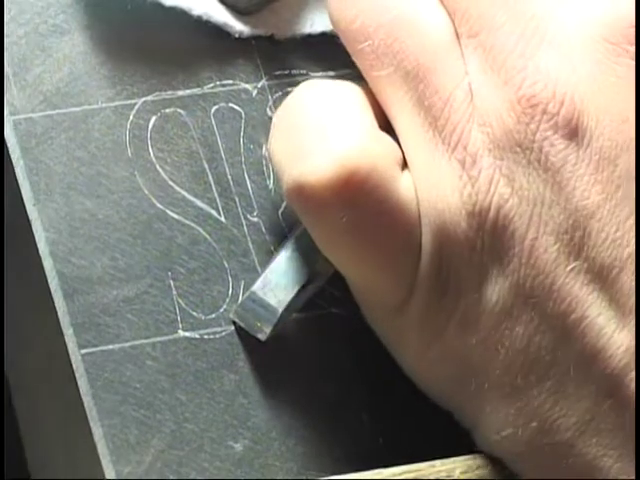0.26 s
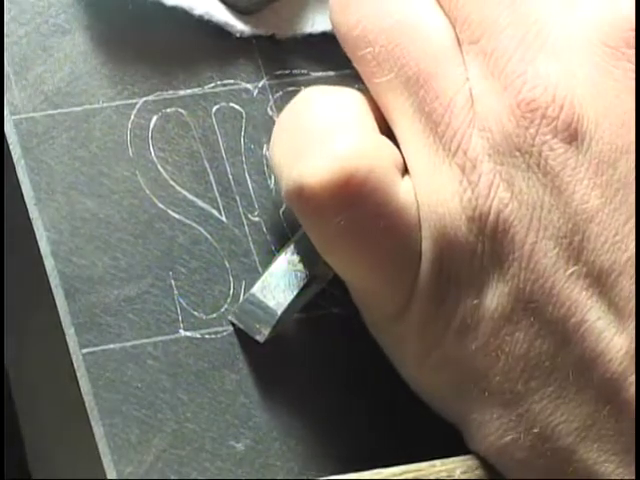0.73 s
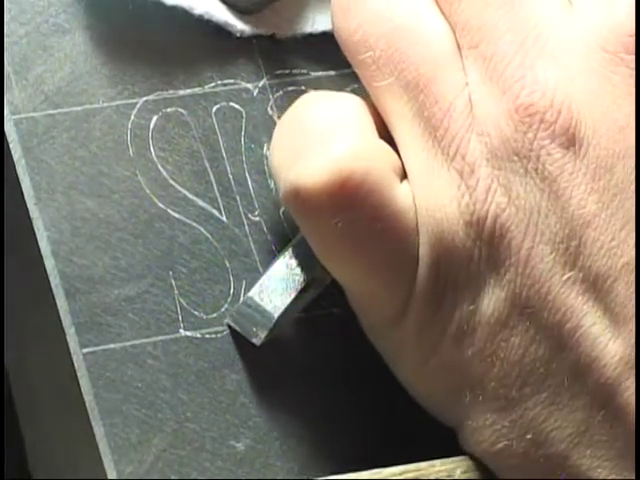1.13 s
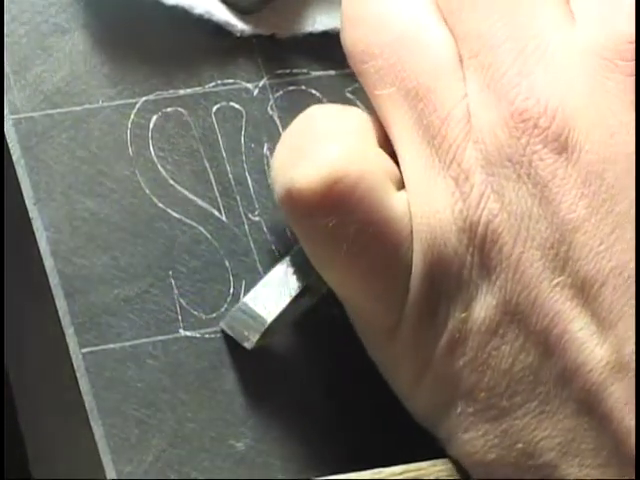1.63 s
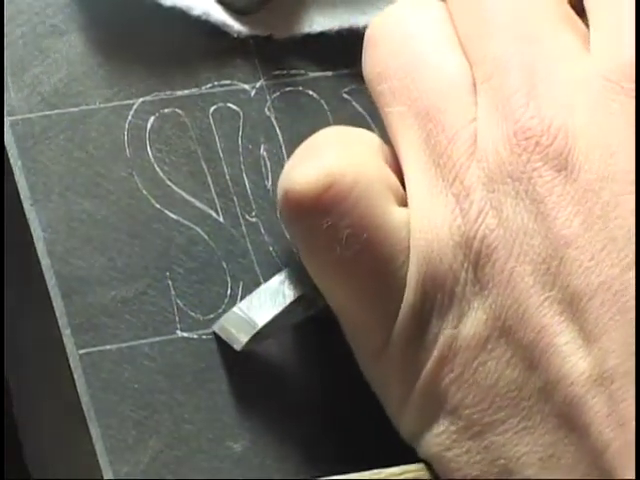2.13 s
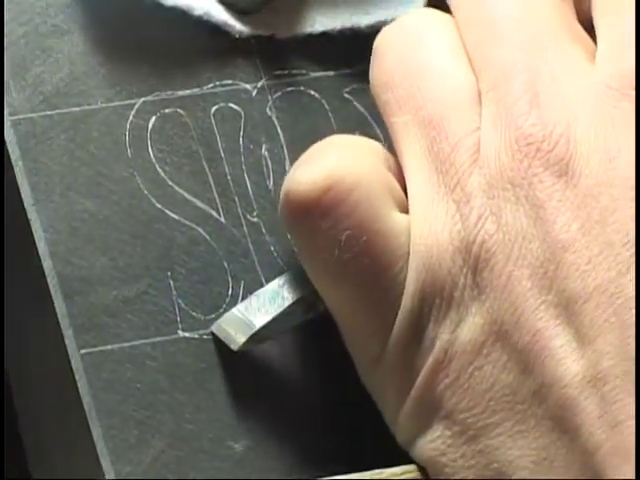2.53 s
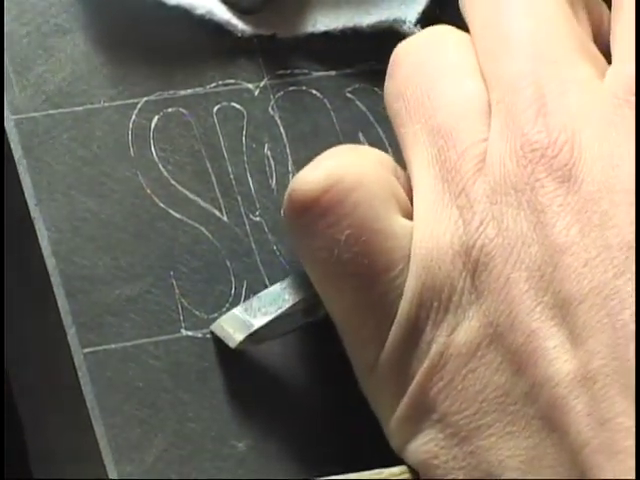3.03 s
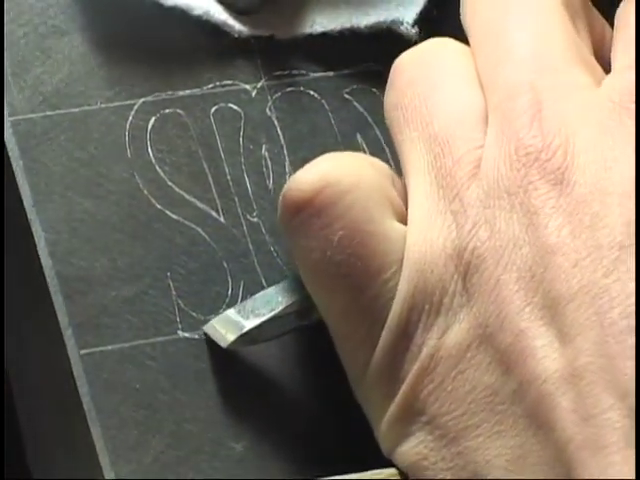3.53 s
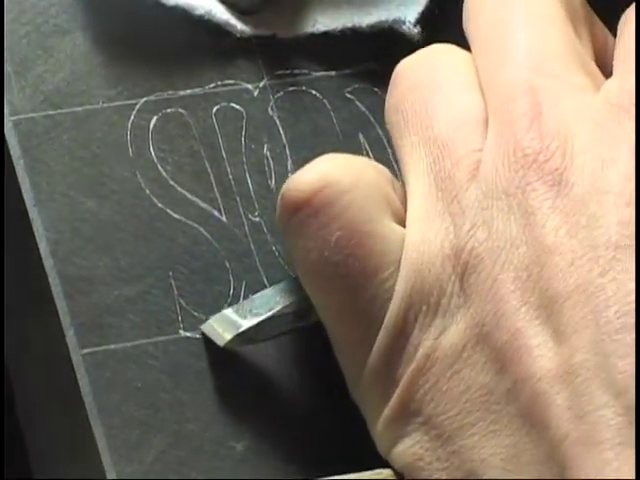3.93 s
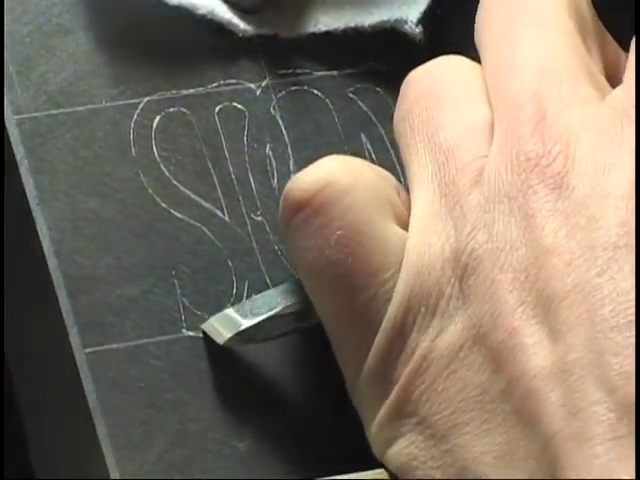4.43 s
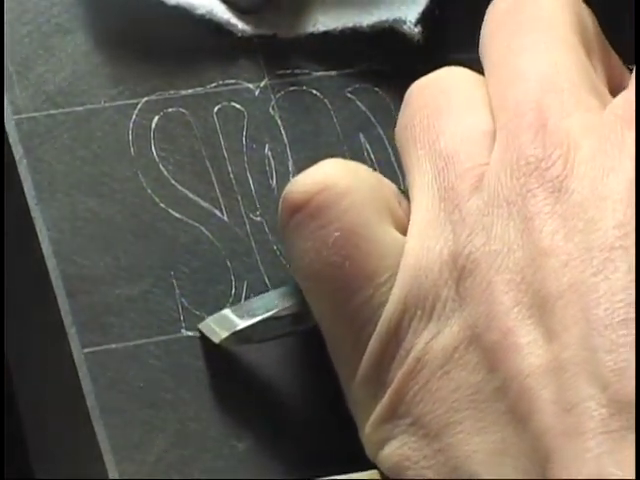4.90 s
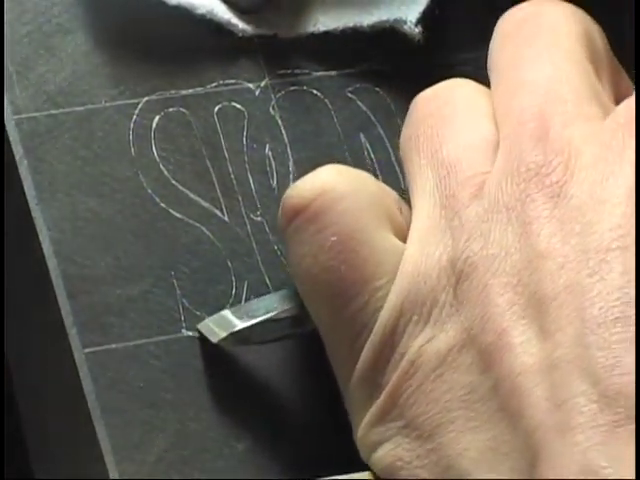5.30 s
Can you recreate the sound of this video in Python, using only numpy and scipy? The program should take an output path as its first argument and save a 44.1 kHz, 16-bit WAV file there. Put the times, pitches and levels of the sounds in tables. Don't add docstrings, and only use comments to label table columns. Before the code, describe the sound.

A close, nearly centred microphone in a small workshop picks up a hammer tapping a steel chisel into a slate slab on a wooden bench. The remnant of an earlier blow dies away at the very start; the first full tap comes at about 0.1 s, then taps follow every 0.2 s, slightly uneven by hand, until about 5.4 s, twenty-eight in all. Each is a dry, bright metallic crack with a tiny chatter, then a hollow stone ring of around a quarter second and a softer, lower wooden resonance. Early taps are lighter and duller; from roughly 2.4 s they grow harder, with more bench weight, strongest near 4.8 s. Between about 1.7 and 2.5 s some upper bite is shaded away. Faint ticks and thin steel rings follow occasional blows. Short room reflections answer each one, over soft air, hiss and a barely perceptible high whine.

```python
import sys
import numpy as np
from scipy import signal
from scipy.fft import rfft, irfft
from scipy.io import wavfile

SR = 44100
rng = np.random.default_rng(int(sys.argv[2]) if len(sys.argv) > 2 else 0)


def gain_from_db(level_db):
    decades = np.asarray(level_db, float) / 20
    return 10 ** decades


def persist_wave(psi):
    counts = np.round(np.clip(psi, -1, 1) * 32767).astype(np.int16)
    wavfile.write(sys.argv[1], SR, np.atleast_2d(counts).T)


N = 245190


def at_hz(points, hz):
    table_hz, values = np.transpose(points)
    return np.interp(np.log(np.maximum(hz, 1)), np.log(table_hz), values)


def coloured(spectrum, size):
    white = rfft(rng.standard_normal(size))
    noise = irfft(white * gain_from_db(at_hz(spectrum, np.fft.rfftfreq(size, 1 / SR))), size)
    return noise / np.std(noise)


# pitch_hz, level_db (per Hz)
AIR = [(25, 1.5), (60, 1), (150, 1.5), (400, -5.5), (700, -1.5), (1200, -1.5), (2000, -10.5), (4000, -14),
       (8000, -21.5), (13000, -25)]
# pitch_hz, level_db (per Hz)
HISS = [(15, -33), (25, 4), (140, 7), (639, -3), (1290, -5.5), (1820, -12.5), (2420, -12), (4910, -15.5),
        (6890, -19), (12900, -23.5), (16800, -61), (22000, -120)]
AIR_DB, HISS_DB = -49, -60.5
WHINE_HZ, WHINE_DB = 12000, -83


def microphone_floor():
    whine = gain_from_db(WHINE_DB) * np.sin(2 * np.pi * WHINE_HZ * np.arange(N) / SR)
    middle = gain_from_db(AIR_DB) * coloured(AIR, N) + whine
    return middle, gain_from_db(HISS_DB) * coloured(HISS, N)


# start_s, force_db, slab_low_db, slab_high_db (what the slab's two families take up)
BLOWS = [(0.081, -15.5, -31, -31.5), (0.2791, -14.5, -25, -28), (0.4638, -14.5, -25.5, -29),
         (0.6654, -14.5, -29.5, -28.5), (0.8647, -11.5, -27, -26), (1.051, -11.5, -28.5, -27),
         (1.244, -12.5, -31.5, -26.5), (1.4398, -12, -29.5, -32.5), (1.6347, -12, -25.5, -28.5),
         (1.8276, -11.5, -25.5, -29.5), (2.0203, -12.5, -26.5, -29.5), (2.1989, -12.5, -28.5, -29),
         (2.4027, -10, -28, -28.5), (2.5974, -7, -22.5, -26), (2.7902, -9, -23, -27),
         (2.9887, -10, -21.5, -26.5), (3.1913, -10, -33, -30), (3.385, -8, -27.5, -26.5),
         (3.5875, -8, -33, -27.5), (3.7848, -8, -30, -28.5), (3.9889, -6.5, -23.5, -24.5),
         (4.1974, -6.5, -25, -31.5), (4.4005, -7.5, -27, -29), (4.5972, -6, -32.5, -33.5),
         (4.799, -4, -27, -28), (5.0032, -4.5, -28.5, -28), (5.2083, -7, -29.5, -34),
         (5.4072, -7, -30.5, -28.5)]


def earlier_blow(near):
    start = round((BLOWS[1][0] + .125) * SR)
    tail = np.pad(near[start:start + 2500], (0, N - 2500))
    return gain_from_db(3.0) * tail * np.exp(-np.arange(N) / 2900.0)


def ring(clicks, hz, t60):
    r, w = gain_from_db(-60 / (t60 * SR)), 2 * np.pi * hz / SR
    return signal.lfilter([0, np.sin(w)], [1, -2 * r * np.cos(w), r * r], clicks + 1e-18)


# start_s, level_db (peak), pitch_hz, t60_s
TICKS = [(.03, -41, 476, 0.086), (.866, -42, 4330, 0.2), (1.052, -47, 4360, .14), (1.245, -52, 4320, .14),
         (3.1, -37, 1650, 0.04), (4.402, -43, 4320, 0.1), (4.599, -38, 2480, 0.06),
         (4.617, -44, 9600, 0.018), (4.63, -56, 9400, .015), (4.6, -43, 4350, 0.08),
         (2.599, -44, 5000, .07), (4.8, -37, 4450, 0.1), (5.005, -36, 4350, 0.08)]


def ticks():
    out = np.zeros(N)
    for s, db, hz, t60 in TICKS:
        click = gain_from_db(db) * (np.arange(N) == int(s * SR))
        out += ring(click, hz, t60) - ring(click, hz, 0.2 * t60)
    return out


CARRY_OVER = .75
LEAN_FROM_S, LEAN_TAKES_S = 2.64, 1.76


def creeping(shape):
    fresh = np.sqrt(1 - CARRY_OVER ** 2)
    return signal.lfilter([fresh], [1, -CARRY_OVER], rng.standard_normal(shape), axis=0)


def lean(s):
    return np.clip((s - LEAN_FROM_S) / LEAN_TAKES_S, 0, 1)


def lay(pieces, at, level_db):
    out = np.zeros(N + pieces.shape[1])
    for piece, s, db in zip(pieces, at, level_db):
        start = int(s * SR)
        out[start:start + len(piece)] += gain_from_db(db) * piece / np.linalg.norm(piece)
    return out[:N]


# start_s alone, then level_db alone
CONTACT_S = [0, .0017, .0022, .0028, .0036, .0045]
CONTACT_DB = [-24, 0, -2, -4, -8, -14]
SLIP_S, CONTACT_SCATTER_DB = .00006, -2.2


def rattled(modes, where, at, contact_db, brighten_db=0):
    rings = 0
    for k, (hz, level_db, t60) in enumerate(modes):
        if k == 1:
            level_db = level_db + brighten_db * lean(at)[:, None]
        strength_db = contact_db + CONTACT_SCATTER_DB * creeping(where.shape) + level_db
        clicks = np.zeros((len(at), 2000))
        np.put_along_axis(clicks, where, gain_from_db(strength_db), axis=1)
        rings = rings + (-1) ** k * ring(clicks, hz, t60)
    return rings


# pitch_hz, level_db, t60_s
HEAD = [(1216, 6, 0.025), (1505, -2, 0.048), (1800, -2, 0.0052)]
SHANK = [(1964, 1.5, 0.0043), (2430, -3.5, 0.032), (2730, 0, 0.022), (3197, 8, 0.0076), (3330, -66, 0.0054)]
EDGE = [(4165, 5, 0.0034), (4293, 0.5, 0.0073), (4703, -5.5, 0.0061), (5610, 3.5, 0.0014),
        (6250, 0.5, 0.0012)]
CHISEL = [(7600, 0.5, 0.00067), (9210, 2, 0.0045), (9100, -16, 0.0042), (11000, -40, 0.0023)]
# start_s, level_db (against the force)
SQUARE = [(0, -29.5), (.65, -36), (1.1, -32.5), (1.65, -39), (2.2, -42), (2.6, -33), (3.6, -32), (4.2, -34),
          (4.6, -39.5), (5.5, -38.5)]
MEAN_FORCE_DB = -10
HEAD_DB, HEAD_FOLLOWS, HEAD_DULL_DB, BEDS_IN_S = 2, 0.32, 13, 2.57
EDGE_DB, EDGE_DULL_DB, BITES_S, EDGE_FADE_DB_PER_S = 6.5, 18, 0.16, 0.66
SHANK_DB, CHISEL_DB = 6.5, 17
HEAD_BRIGHTENS_DB = 8
HEAD_SHRUGS = 6.1


def steel():
    at, force_db = np.transpose(BLOWS)[:2]
    head_db = HEAD_DB + HEAD_FOLLOWS * (force_db - MEAN_FORCE_DB) - HEAD_DULL_DB * np.exp(-at / BEDS_IN_S)
    edge_db = force_db + EDGE_DB - EDGE_DULL_DB * np.exp(-at / BITES_S) - EDGE_FADE_DB_PER_S * at
    chisel_db = force_db + np.interp(at, *np.transpose(SQUARE)) + CHISEL_DB
    slip_s = SLIP_S * creeping((len(at), len(CONTACT_S)))
    where = np.clip((CONTACT_S + slip_s) * SR, 0, 500).astype(int)
    contact_db = np.array(CONTACT_DB)
    touch = at - .0023

    head = rattled(HEAD, where, at, HEAD_SHRUGS * contact_db, HEAD_BRIGHTENS_DB)
    dull = lay(head, touch, head_db)
    dull = dull + lay(rattled(SHANK, where, at, contact_db), touch, force_db + SHANK_DB)
    dull = dull + lay(rattled(EDGE, where, at, contact_db), touch, edge_db)
    lengthwise = lay(rattled(CHISEL, where, at, contact_db), touch, chisel_db)
    return lengthwise + signal.sosfilt(signal.butter(5, 6000, fs=SR, output="sos"), dull)


def struck(modes, at, blow_db, scatter_db, rise_s, late_s=.0):
    out = np.zeros(N)
    for hz, level_db, t60 in modes:
        clicks = np.zeros(N)
        where = ((at + late_s * rng.random(len(at))) * SR).astype(int)
        clicks[where] = gain_from_db(blow_db + level_db + scatter_db * rng.standard_normal(len(at)))
        out += ring(clicks, hz, t60) - ring(clicks, hz, rise_s)
    return out


# pitch_hz, level_db, t60_s
SLAB_LOW = [(566, -19, .45), (585, -6, .1), (612, 0, .09), (640, -11, .42), (712, -12, .24)]
SLAB_HIGH = [(766, -15, .3), (805, -14, .2), (839, 0, .19), (879, -10, .25), (915, -16, .33)]
SLAB_TOP = [(945, -3, .33), (975, -2, .27), (1018, -1, .27), (1046, -1, .28), (1089, 0, .3), (1126, -2, .3),
            (1165, -2, .25), (1222, -3, .22), (1360, -6, .2)]
# pitch_hz, level_db, t60_s
BENCH = [(126.4, 1.5, 0.092), (240.4, 2, 0.26), (266.2, -6, 0.45), (314.1, -4.5, 0.22), (403.8, -2, 0.16),
         (450, -21, 1)]
# pitch_hz, level_db, t60_s
PUSH = [(164.3, 7, 0.023), (72.4, -5, 0.057)]
BODY_LEADS_S = 0.00083
TOP_DB, TOP_YIELDS, TOP_FADE_DB_PER_S = -37, 0.2, 0.52
BENCH_DB, LEAN_DB = -40.5, 8
PUSH_DB, PUSH_FOLLOWS = -24, 0.8
SLAB_FROM_HZ = 587


def slab_and_bench():
    s, force_db, low_db, high_db = np.transpose(BLOWS)
    at = s - BODY_LEADS_S
    top_db = TOP_DB - TOP_YIELDS * (low_db - low_db.mean()) - TOP_FADE_DB_PER_S * s
    bench_db = BENCH_DB + LEAN_DB * lean(s)
    push_db = PUSH_DB + PUSH_FOLLOWS * (force_db - MEAN_FORCE_DB)

    slab = struck(SLAB_LOW, at, low_db + 5, scatter_db=2.5, rise_s=0.015)
    slab = slab + struck(SLAB_HIGH, at, high_db + 5.5, scatter_db=0.2, rise_s=0.02, late_s=0.00066)
    slab = slab + struck(SLAB_TOP, at, top_db, scatter_db=2.8, rise_s=0.0023, late_s=0.00084)
    slab = signal.sosfilt(signal.butter(4, SLAB_FROM_HZ, "high", fs=SR, output="sos"), slab)
    push = struck(PUSH, at, push_db, scatter_db=0.84, rise_s=0.014)
    bench = struck(BENCH, at, bench_db, scatter_db=2.9, rise_s=0.048)
    return -(slab + bench + push)


# pitch_hz, level_db (per Hz)
TAIL = [(150, -18), (440, -12), (580, -15), (900, -1.5), (1500, -7), (2500, -16), (4500, -16), (6000, -39),
        (12000, -58)]
# pitch_hz, t60_s
TAIL_T60 = [(60, 0.74), (400, 0.75), (1000, 0.27), (3000, 0.35), (8000, 0.24)]
TAIL_DB, ROOM_SCATTER_DB, ROOM_SWELL_S = -8, 2.2, 0.0011


def workshop():
    at, room_db = np.transpose(BLOWS)[:2]
    white, out = rng.standard_normal((2, N)), 0
    edges = 150 * 2 ** np.arange(0, 6.1, 1 / 6)
    swell = np.exp(-1 / (ROOM_SWELL_S * SR))
    for k, (low, high) in enumerate(zip(edges, edges[1:])):
        sos = signal.butter(2, [low, high], "band", fs=SR, output="sos")
        band = signal.sosfilt(sos, white[k % 2])
        hz = np.sqrt(low * high)
        blows = np.full(N, 1e-18)
        blows[(at * SR).astype(int)] = gain_from_db(room_db + ROOM_SCATTER_DB * rng.standard_normal(len(at))) ** 2
        dying = gain_from_db(-60 / (at_hz(TAIL_T60, hz) * SR)) ** 2
        energy = signal.lfilter([dying - swell], np.convolve([1, -dying], [1, -swell]), blows)
        out = out + band * gain_from_db(at_hz(TAIL, hz)) * np.sqrt(np.abs(energy))
    return gain_from_db(TAIL_DB) * out


SHADE_HZ, SHADE_WIDTH_HZ, SHADE_FROM_S, SHADE_TAKES_S, SHADE = 3840, 1040, 1.7, 0.8, 0.7


def shaded(x):
    share = SHADE * np.clip((np.arange(N) / SR - SHADE_FROM_S) / SHADE_TAKES_S, 0, 1)
    return x - share * signal.lfilter(*signal.iirpeak(SHADE_HZ, SHADE_HZ / SHADE_WIDTH_HZ, SR), x)


def scene():
    crack, body = steel(), slab_and_bench()
    near = shaded(crack + workshop()) + body
    floor, hiss = microphone_floor()
    mid = near + earlier_blow(near) + ticks() + floor
    side = hiss + gain_from_db(-48.0) * np.roll(crack, 9) + gain_from_db(-24.0) * np.roll(near, 30)
    return np.array([mid + side, mid - side])


def band_limit(x):
    return signal.sosfilt(signal.butter(12, 13710, fs=SR, output="sos"), x)


def record(dry):
    mix = signal.sosfilt(signal.cheby2(14, 60, 13400, fs=SR, output="sos"), dry)
    return band_limit(mix)


dry = scene()
out = record(dry)
persist_wave(out)
```